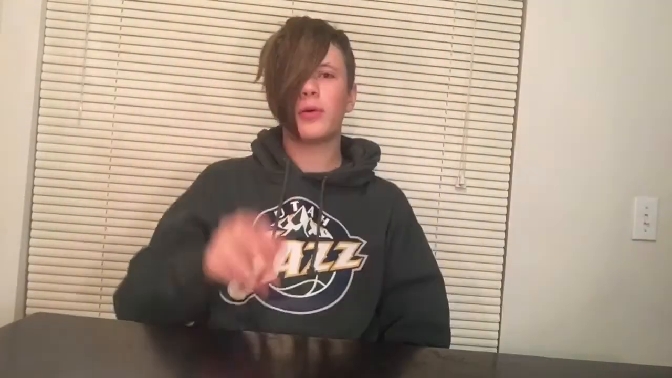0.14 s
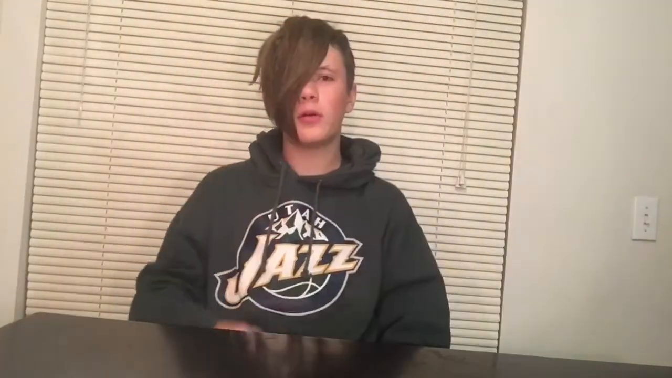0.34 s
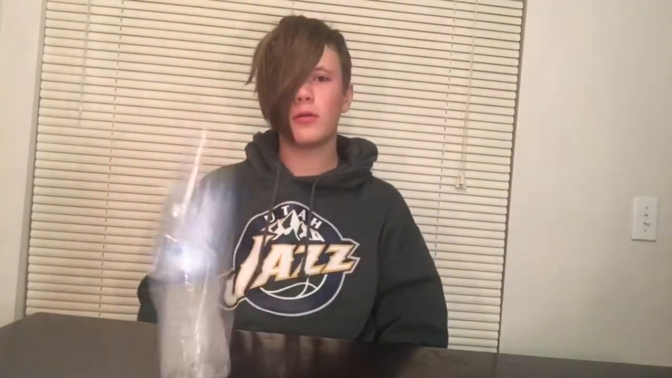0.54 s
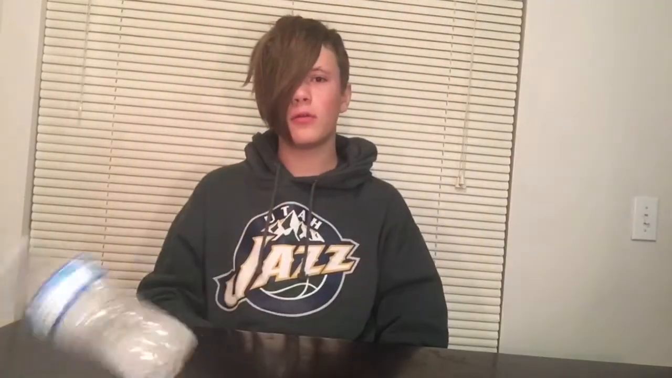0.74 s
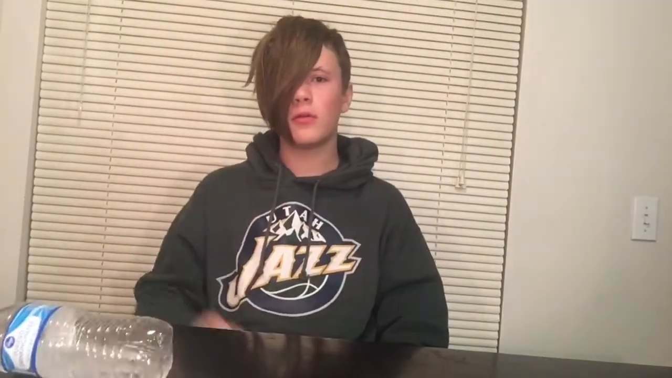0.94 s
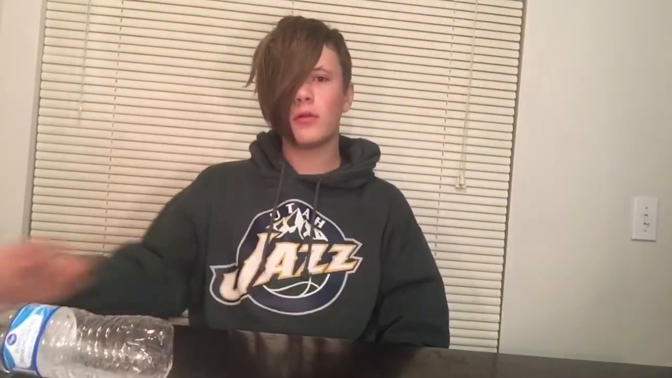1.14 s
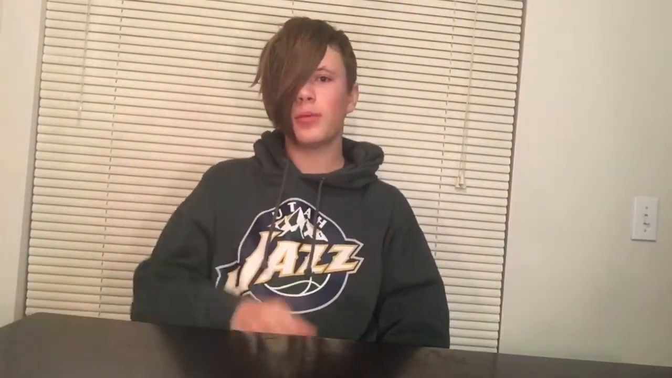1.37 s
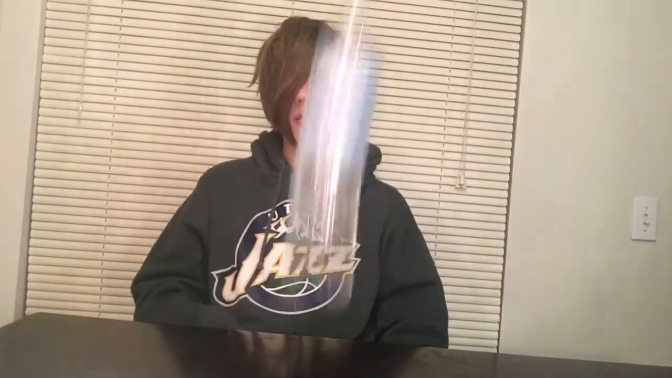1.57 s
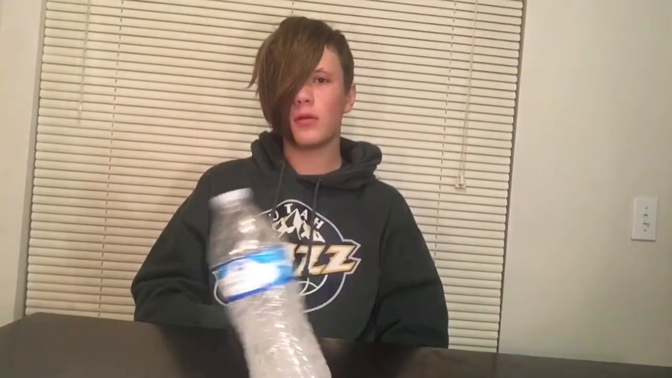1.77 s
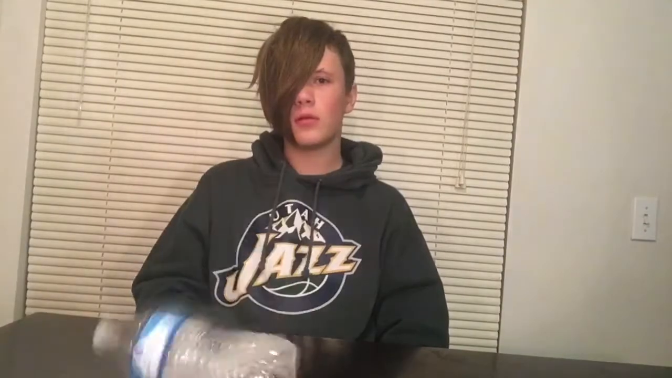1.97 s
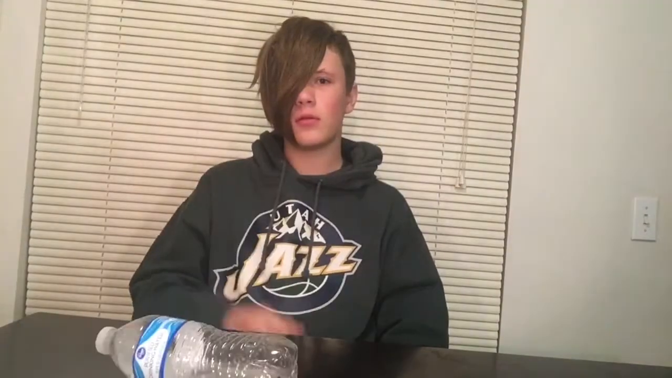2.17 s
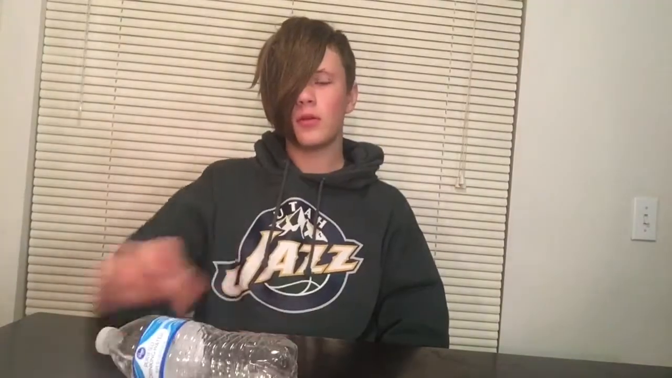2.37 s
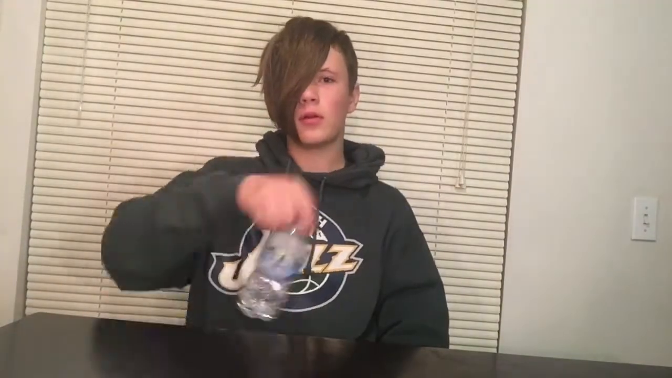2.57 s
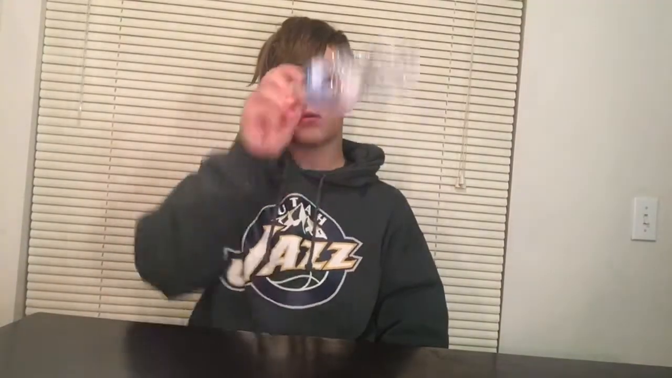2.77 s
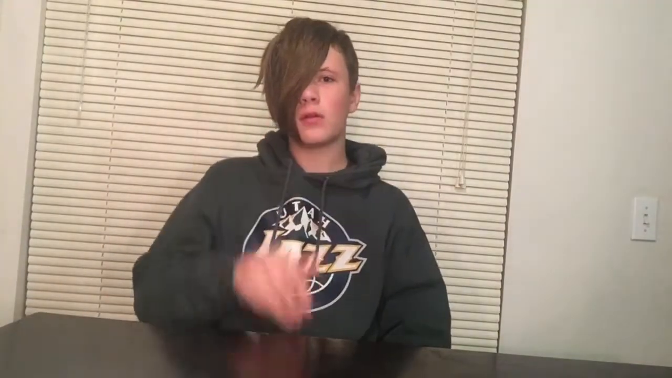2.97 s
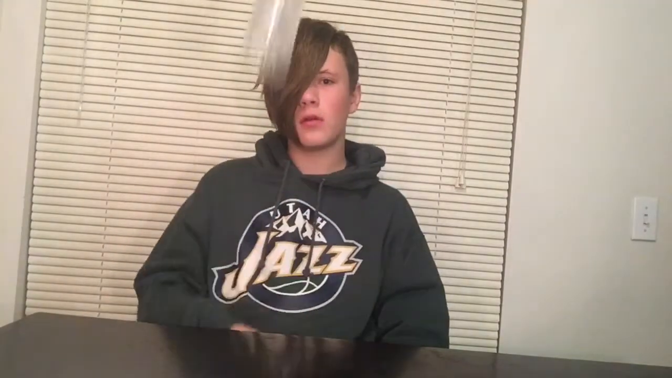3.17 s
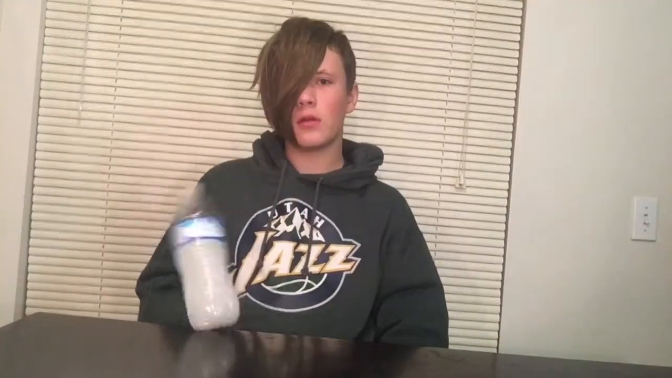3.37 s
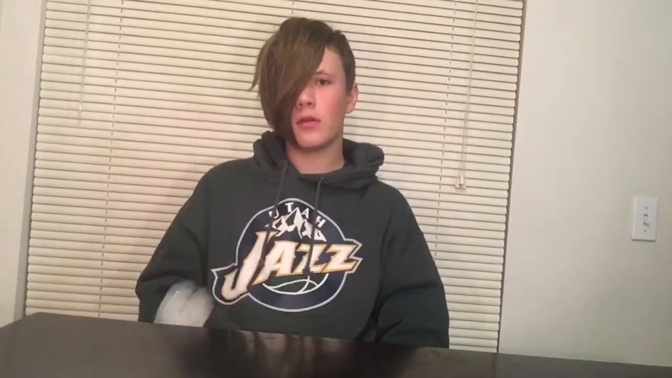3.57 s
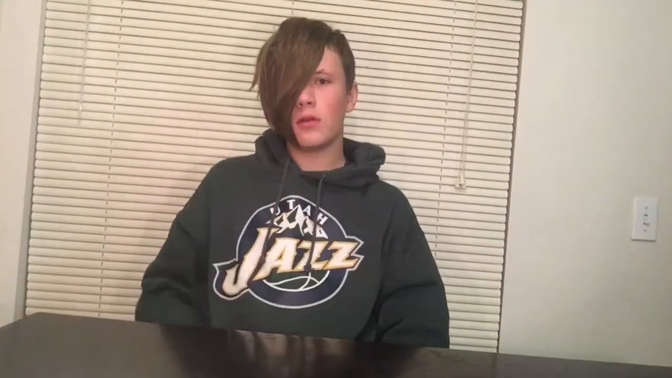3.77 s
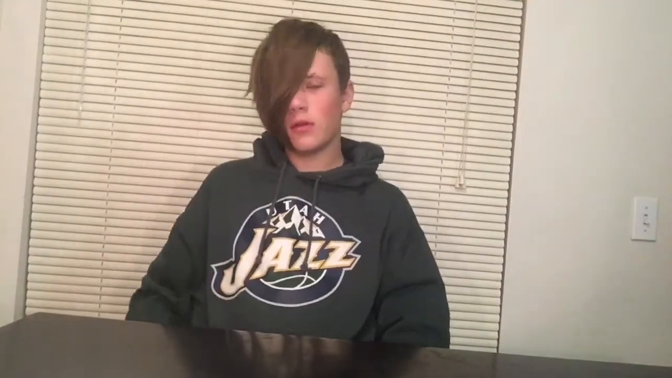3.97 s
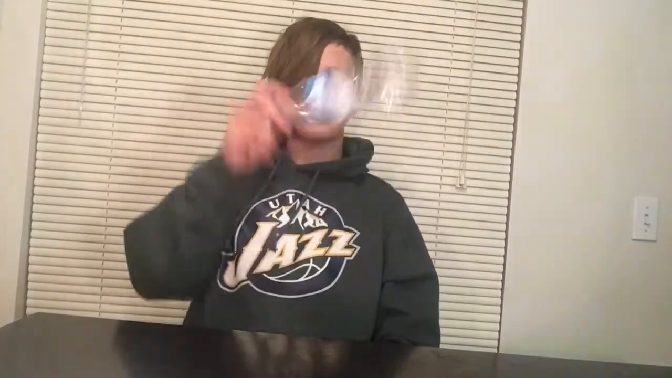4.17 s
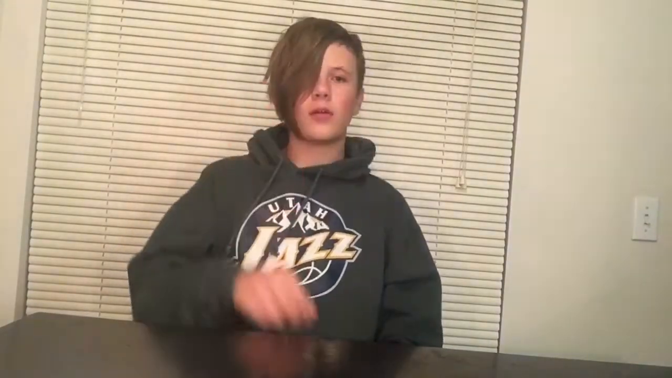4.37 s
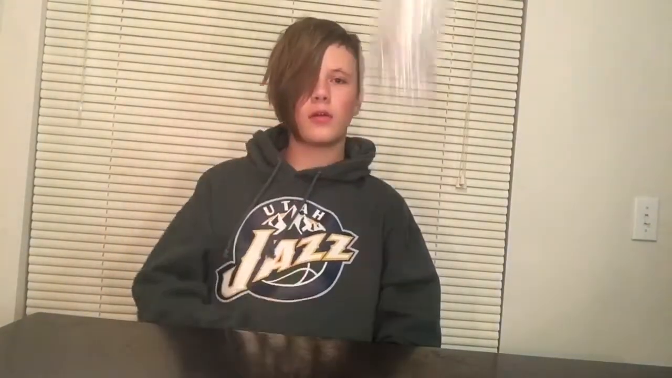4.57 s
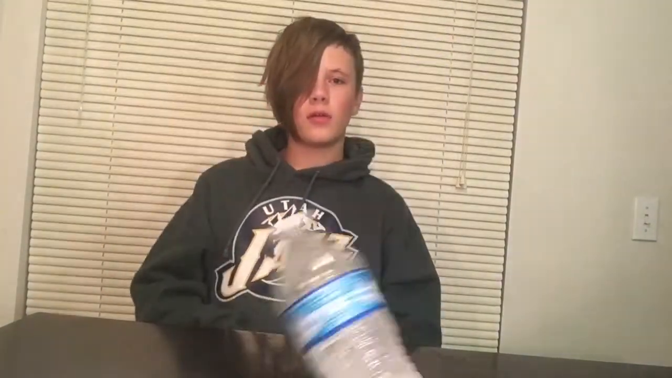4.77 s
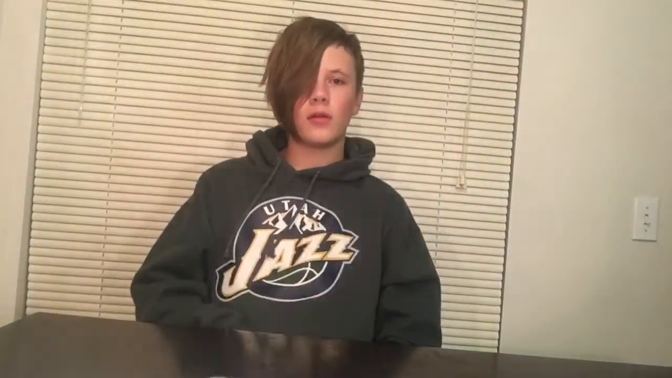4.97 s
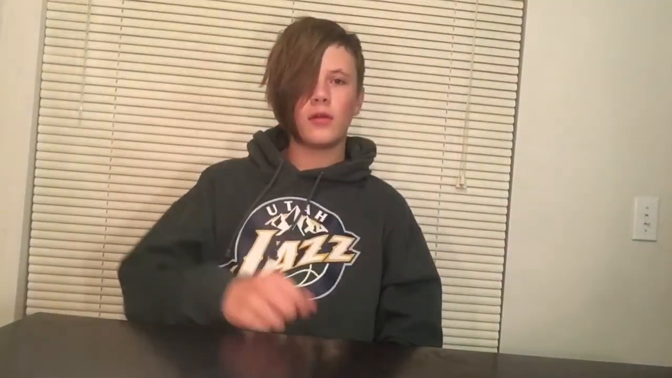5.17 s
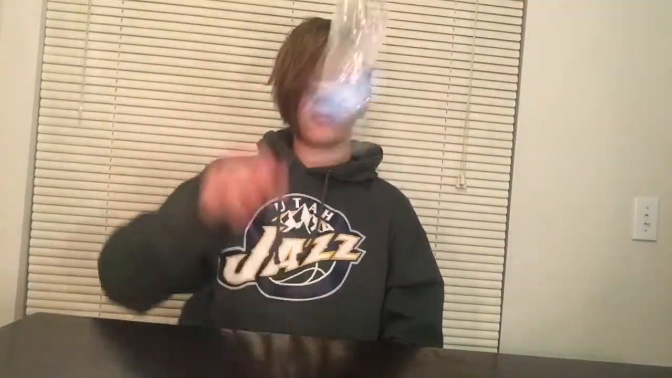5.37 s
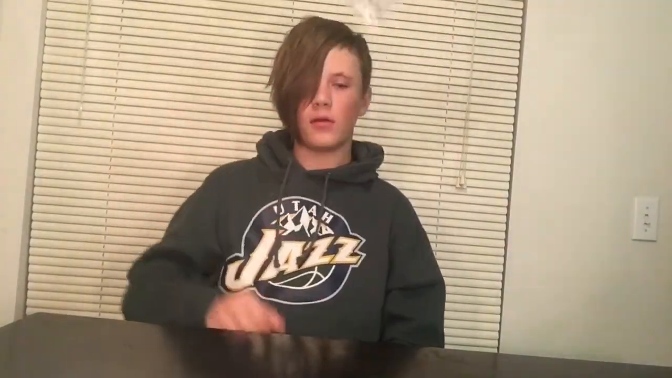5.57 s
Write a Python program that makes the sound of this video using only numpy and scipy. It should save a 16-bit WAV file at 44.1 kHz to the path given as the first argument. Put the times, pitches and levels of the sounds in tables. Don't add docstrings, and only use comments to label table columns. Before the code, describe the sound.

Close to the microphone in a bare, lively room, a part-filled plastic bottle lands four times on a wooden table with hollow, booming slaps and splashing water. Some landings bounce or topple with a hard cap knock. Between them come hand bumps, thin plastic crackles, sleeve rustle and abrupt scene cuts, over faint house hum.

```python
import sys
import numpy as np
from scipy import signal
from scipy.fft import rfft, irfft, next_fast_len
from scipy.io import wavfile
from scipy.ndimage import map_coordinates

SR = 44100
rng = np.random.default_rng(int(sys.argv[2]) if len(sys.argv) > 2 else 0)


def invert_db(x):
    u = np.asarray(x, float) / 20
    return 10 ** u


def generate_wav(sig):
    pcm = np.round(np.clip(np.atleast_2d(sig).T, -1, 1) * 32767).astype(np.int16)
    wavfile.write(sys.argv[1], SR, pcm)


N = 248283


def unit(x):
    return x / np.sqrt(np.mean(x ** 2) + 1e-20)


def peak(x):
    return x / np.abs(x).max()


def along(points, hz):
    f, v = np.transpose(points)
    return np.interp(np.log(hz + 1), np.log(f + 1), v)


def filtered(x, response):
    m = next_fast_len(len(x) + 4096)
    return irfft(rfft(x, m) * response(np.fft.rfftfreq(m, 1 / SR)), m)[:len(x)]


def noise(spectrum, size):
    return unit(filtered(rng.standard_normal(size), lambda hz: invert_db(along(spectrum, hz))))


def resonance(f, hz, width):
    return 1j * f * width / (hz * hz - f * f + 1j * f * width)


def fall(t, t60, rise):
    return (1 - np.exp(-t / rise)) * invert_db(-60 * t / t60)


def clock(seconds):
    return np.arange(int(SR * seconds)) / SR


def add(track, s, sound):
    part = track[max(round(s * SR), 0):][:len(sound)]
    part += sound[:len(part)]


# f/Hz, t60/s
ROOM_T60 = [(60, 0.32), (250, 0.48), (800, 0.5), (2000, 0.5), (5000, 0.52), (9000, .45), (13000, 0.42)]
# f/Hz, level/dB
ROOM_TONE = [(60, -6), (300, -2.5), (1500, 0), (5000, 2.5), (9000, -0.5), (14000, -8)]


def room(x, wet_db):
    hz, t, z = signal.stft(rng.standard_normal(SR // 2), SR, nperseg=256)
    decay_db = along(ROOM_TONE, hz)[:, None] - 60 * t / along(ROOM_T60, hz)[:, None]
    tail = signal.istft(z * invert_db(decay_db), SR, nperseg=256)[1]
    tail = np.pad(tail / np.linalg.norm(tail), (300, 0))[:len(x)]

    f = np.fft.rfftfreq(len(x), 1 / SR)
    total = np.cumsum(np.abs(rfft(x)) ** 2)
    half = 25 + .09 * f
    even = (np.interp(f + half, f, total) - np.interp(f - half, f, total)) / (2 * half / f[1])
    return x + invert_db(wet_db) * irfft(rfft(tail, len(x)) * np.sqrt(np.abs(even)), len(x))


# f/Hz, level/dB per Hz
HUM = [(15, -41), (25, -16), (76, -17), (111, -4.5), (197, 0), (400, -10), (490, -4.5), (760, -90.5)]
# f/Hz, level/dB per Hz
AIR = [(300, -41), (568, -17.5), (979, -21), (1510, -25.5), (2210, -32.5), (2400, -32), (10500, -50.5),
       (16000, -52)]
# f/Hz, level/dB
WHINE = (2197, -75)


def house():
    whine_hz, whine_db = WHINE
    whine = invert_db(whine_db) * np.sin(2 * np.pi * whine_hz * np.arange(N) / SR)
    return invert_db(-57) * noise(HUM, N) + invert_db(-66.5) * noise(AIR, N) + whine


# start t/s, hold/s, level/dB
MOVES = [(0, 0.01, -55), (.24, 0.069, -59), (1.12, 0.4, -68.5), (2.26, 0.18, -69.5), (2.596, 0.18, -76.5),
         (3.004, 0.16, -72), (3.675, 0.097, -58.5), (4.358, 0.16, -64), (4.5, 0.023, -74.5),
         (5.127, 0.32, -79), (5.528, .05, -65.5), (5.6, .05, -64)]
# f/Hz, level/dB per Hz
CLOTH = [(400, -31.5), (800, -1), (1500, 1.5), (2400, -3.5), (3500, -1), (4800, -10), (8000, -17),
         (16000, -35.5)]


def rustle():
    rise_db_per_s, fall_db_per_s, lumps_per_s = 74, 91, 140
    t = np.arange(N) / SR
    effort = np.zeros(N)
    for s, hold, db in MOVES:
        before, after = np.clip(s - t, 0, None), np.clip(t - s - hold, 0, None)
        effort += invert_db(db - rise_db_per_s * before - fall_db_per_s * after) ** 2
    knots = rng.standard_normal(int(N * lumps_per_s / SR) + 4)
    lumps = invert_db(3.5 * map_coordinates(knots, [t * lumps_per_s]))
    return invert_db(3.5) * np.sqrt(effort) * unit(lumps * noise(CLOTH, N))


# t/s, peak level/dB
SWAYS = [(0, -47.5), (0.636, -37), (0.891, -39.5), (1.708, -40), (2.06, -42), (2.581, -49), (3.395, -32),
         (3.6, -55.5), (4.009, -49), (4.759, -32.5), (4.982, -48)]


def sways():
    out, t = np.zeros(N), clock(.5)
    swing = fall(t, t60=.32, rise=0.022) * np.sin(2 * np.pi * 47.6 * t)
    for s, db in SWAYS:
        add(out, s, invert_db(db + 7.0) * swing)
    return out


# t/s of the peak, level/dB
SLIPS = [
    (0.17, -48),
    (2.881, -41.5),
    (4.251, -44),
    (4.411, -42.5),
    (5.402, -42.5),
]


def slips():
    out, t = np.zeros(N), clock(.5) - .025
    hz, swell_s, t60_s = 2820, .009, 0.058
    swell = np.where(t < 0, np.exp(t / swell_s), invert_db(-60 * t / t60_s))

    def skin(f):
        return resonance(f, hz, 1.9 * hz) ** 3 / (1 + (f / 6000) ** 4)

    for s, db in SLIPS:
        hiss = unit(filtered(rng.standard_normal(len(t)), skin))
        add(out, s + t[0], invert_db(db) * room(hiss * swell, wet_db=-10))
    return out


# t/s, peak level/dB, f/Hz, hiss level/dB
BUMPS = [(0.009, -34, 386, -21), (0.123, -40.5, 464, -7), (0.167, -35.5, 300, -5.5), (1.351, -28, 365, -20),
         (1.403, -36.5, 400, -14), (1.444, -35, 390, -13), (2.581, -35, 311, -26), (3.711, -31.5, 238, -26),
         (3.742, -37, 240, -19), (4.008, -17, 170, -9.5), (4.024, -18.5, 129, -7.5),
         (4.247, -38.5, 355, -2.5), (5.404, -28, 402, -23)]


def bumps():
    out, t = np.zeros(N), clock(.5)
    for s, db, hz, hiss_db in BUMPS:
        shape = fall(t, t60=0.1, rise=4 / hz)
        low = unit(filtered(rng.standard_normal(len(t)),
                            lambda f: resonance(f, hz, 0.71 * hz) * resonance(f, hz, 0.67 * hz)))
        puff = low + invert_db(hiss_db) * noise(SPLASH, len(t))
        add(out, s - .003, invert_db(db - 4.5) * room(puff * shape / np.abs(low * shape).max(), wet_db=-20.5))
    return out


def clicks(rows, t60, wet_db=-11.5):
    out, t = np.zeros(N), np.arange(SR // 3) / SR
    for s, db, hz in rows:
        shake = rng.standard_normal((2, len(t)))
        width = .006 * hz / t60
        ring = unit(filtered(shake[0], lambda f: resonance(f, hz, width) * resonance(f, hz, 2 * width)))
        click = unit(filtered(shake[1], lambda f: resonance(f, 0.72 * hz, 1.3 * hz) ** 3))
        sound = ring * fall(t, t60, rise=.0007) + .5 * click * fall(t, 0.0029, 0.0028)
        add(out, s, invert_db(db) * room(peak(sound), wet_db))
    return out


# t/s, peak level/dB, f/Hz
DROPS = [(.11, -43.5, 3500), (0.195, -48, 6300), (0.312, -44, 3900), (.333, -48, 4240), (.415, -57, 4560),
         (2.565, -66, 10980), (2.636, -45, 4080), (2.693, -57, 6360), (2.698, -59, 13760),
         (2.982, -45.5, 4440), (2.989, -49, 5630), (3.036, -51, 8670), (3.149, -53, 6870),
         (3.157, -54.5, 9170), (3.159, -47.5, 4190), (3.178, -44.5, 6120), (4.305, -53.5, 7800),
         (4.345, -54, 6560), (4.435, -41, 6300), (4.484, -61.5, 7300), (4.411, -48, 10600),
         (5.235, -52.5, 6500), (5.293, -52.5, 4770), (5.44, -58, 9900), (5.458, -53.5, 7570),
         (5.497, -57, 13000), (5.484, -46, 5300), (5.538, -42, 6120), (5.557, -47, 7430)]


def drops():
    return clicks(DROPS, t60=.022)


# t/s, peak level/dB, f/Hz
TICKS = [(0.0126, -38, 1320), (0.2878, -32.5, 1370), (1.093, -38, 900), (1.106, -38, 1610),
         (1.112, -41, 710), (1.101, -27, 1140), (1.3992, -40, 3320), (1.4478, -36, 2734),
         (2.8742, -37, 1750), (2.8831, -33, 2270), (3.158, -46.5, 2720), (3.1748, -44, 2534),
         (3.7375, -36.5, 1610), (4.3831, -45.5, 1884), (4.3967, -40.5, 2840), (4.4105, -36, 1830),
         (4.4543, -38.5, 3500), (4.4755, -51.5, 3260), (5.1708, -36, 1285), (5.19, -34, 1500),
         (5.2911, -43.5, 1770), (5.41, -30.5, 2830), (5.521, -37.5, 3100), (5.5561, -42, 2500)]


def crackles():
    return clicks(TICKS, t60=0.024)


# t/s, peak level/dB, f/Hz
GRIP = [
    (1.347, -49, 3900),
    (1.348, -50.5, 2810),
    (1.36, -47, 1617),
    (1.4, -51.5, 3450),
]


def grips():
    return clicks(GRIP, t60=.15)


# t/s, peak level/dB, f/Hz
CAPS = [
    (2.059, -12, 2605),
    (4.98, -16, 1430),
]


def caps():
    return clicks(CAPS, t60=0.013)


# t/s, peak level/dB, f/Hz
SNAPS = [
    (.668, -29, 6600),
    (.713, -32, 4870),
    (4.842, -43, 7860),
    (4.9855, -10.5, 5430),
]


def snaps():
    return clicks(SNAPS, t60=.006, wet_db=-18.5)


# f/Hz, level/dB per Hz
AFTER_HISS = [(2000, -17.5), (5000, 3), (9000, -4.5), (16000, -8.5)]


def after_hiss():
    out, t = np.zeros(N), clock(.75)
    shape = fall(t, t60=1.6, rise=.02) * np.cos(np.pi / 2 * t / t[-1])
    for s, slap_db, *_ in BLOWS:
        add(out, s, invert_db(-57.5 + .5 * slap_db) * noise(AFTER_HISS, len(t)) * shape)
    return out


def sloshes():
    out, t = np.zeros(N), clock(.01)
    level_db, grains_per_s, t60_s, spread_db, middle_hz = -24, 300, 0.16, 3, 2400
    for s, *_, splash_db in BLOWS:
        gap, size, tone = rng.random((3, 120))
        late = 0.0089 + np.cumsum(-np.log(1 - gap)) / grains_per_s
        pitch = middle_hz * np.exp(2.4 * (tone - .5))
        for dt, e, hz in zip(late, 2 * size, pitch):
            grain = np.sin(2 * np.pi * hz * t) * np.exp(-hz * t / 2.0)
            db = splash_db + level_db + spread_db * (e + 0.5) - 60 * dt / t60_s
            add(out, s + dt, invert_db(db) * grain)
    return out


def onset_hiss():
    out, ramp = np.zeros(N), np.linspace(0, 1, SR // 44)
    for s, *_, splash_db in BLOWS:
        body = noise([(200, -21), (700, 6.5), (1500, -14.0), (3000, -35)], len(ramp))
        hiss = noise(SPLASH, len(ramp)) + 0.24 * body
        add(out, s - len(ramp) / SR, invert_db(splash_db - 46.5 + 1.0 * ramp) * hiss)
    return out


# t/s, slap peak level/dB, table level/dB, shell level/dB, splash level/dB
BLOWS = [
    (.632, -13.5, -18, -11, -8),
    (0.87, -23, -36.5, -31.5, -15.5),
    (1.1, -32.5, -41, -37, -74),
    (1.705, -15.5, -11, -14.5, -7),
    (2.0575, -23.5, -26.5, -28, -15.5),
    (3.395, -8, -15, -13.5, -9.5),
    (4.762, -13, -12.5, -14.5, -8.5),
    (4.978, -27.5, -27.5, -26, -15.5),
]
# f/Hz, level/dB, t60/s
TABLE = [(105.8, -2, 0.33), (172.8, 5.5, 0.11), (197.7, -10.5, 0.49)]
# f/share of its main pitch, level/dB, t60/s
SHELL = [(.7, -2.5, 0.37), (0.922, -9.5, 0.28), (0.999, 7.5, 0.18), (1.19, -0.5, 0.14), (1.519, -3, 0.19),
         (1.818, -5, .1)]
# f/Hz, width/Hz, level/dB
WALL = [(750, 55, 6), (940, 90, -6), (1113, 45, 7), (1330, 60, -6), (1560, 90, 3)]
# f/Hz, level/dB per Hz
SPLASH = [(300, 2), (1000, -1.5), (2500, -2), (4500, -10.5), (8000, -19.5), (12000, -27.5), (16000, -21.5)]
# f/Hz, level/dB per Hz
CRACK = [(1000, -19.5), (3000, 8), (8000, -2), (16000, -15)]


def wall(f):
    modes = sum((-1) ** k * invert_db(db) * resonance(f, hz, w) for k, (hz, w, db) in enumerate(WALL))
    return modes / (1 + 1j * f / 2500) ** 2


def landings():
    out, t = np.zeros(N), clock(.75)
    shell_hz = 348
    squash = 1 + 1.6 * invert_db(-60 * t / 0.12)
    press = 1 - np.exp(-(t / .005) ** 2)
    table = sum(invert_db(db) * fall(t, t60, 0.0014) * press * np.sin(2 * np.pi * hz * t) for hz, db, t60 in TABLE)
    for s, slap_db, table_db, shell_db, splash_db in BLOWS:
        shell = sum(invert_db(db + rng.normal(0, 1)) * fall(t, t60, 0.0039) * np.sin(2 * np.pi * k * shell_hz * t)
                    for k, db, t60 in SHELL)

        contact_s = 0.042 + 0.054 * invert_db(slap_db)
        jolts = rng.standard_normal(len(t)) * fall(t, contact_s, 0.00065)
        first_contact = 0.49 * (np.arange(len(t)) == 30)
        slap = peak(filtered(jolts / np.linalg.norm(jolts) + first_contact, wall))

        spray_s = 0.04 + 0.12 * invert_db(splash_db)
        spray = noise(SPLASH, len(t)) * fall(t, spray_s, 0.0016)
        crack = noise(CRACK, len(t)) * fall(t, 0.0088, 0.00047)
        splash = peak(spray + 1.6 * crack)

        air = invert_db(shell_db) * peak(squash * shell) + invert_db(slap_db) * slap + invert_db(splash_db) * splash
        add(out, s, room(1.49 * air, wet_db=-10.5))
        wood = invert_db(table_db + 2.5) * room(peak(squash * table), wet_db=-7.0)
        add(out, s - .004, wood)
    return out


def scene():
    between_blows = rustle() + slips() + bumps() + crackles() + grips()
    fine_sounds = drops() + after_hiss() + sloshes()
    around_blows = landings() + onset_hiss() + sways() + caps() + snaps()
    return (house() + between_blows + fine_sounds + around_blows)[None]


def roll_off(x):
    return signal.sosfilt(signal.butter(12, 17040, fs=SR, output="sos"), x)


# t/s, fade out/s, fade in/s
CUTS = [
    (0.103, 0.042, 0.0099),
    (1.335, 0.016, 0.0027),
    (2.638, 0.027, 0.047),
    (4.071, 0.044, 0.036),
    (5.306, 0.0074, 0.047),
]
# f/Hz, level/dB
MIC = [(20, -11.5), (40, 2), (15900, 2), (16050, -25.5), (17000, -40.5)]


def record(dry):
    t = np.arange(N) / SR
    fades = [np.clip(np.maximum((s - t) / out, (t - s) / back), .03, 1) for s, out, back in CUTS]
    x = filtered(dry[0] * np.prod(fades, axis=0), lambda hz: invert_db(along(MIC, hz)))[None]
    x = x / (1 + np.abs(x) ** 12) ** (1 / 12)
    return roll_off(x)


dry = scene()
out = record(dry)
generate_wav(out)
```